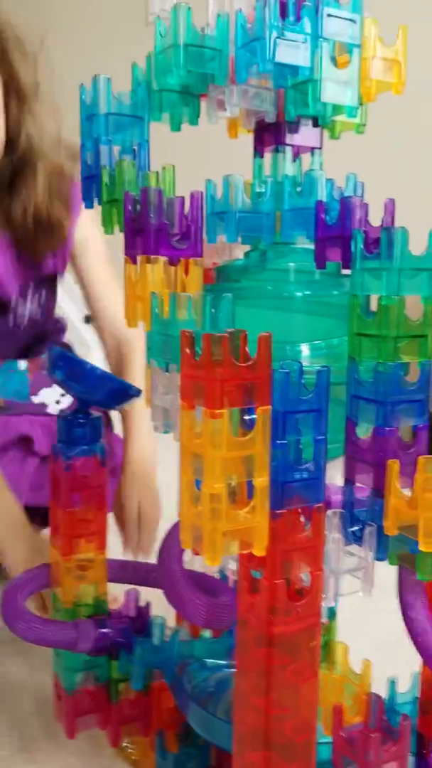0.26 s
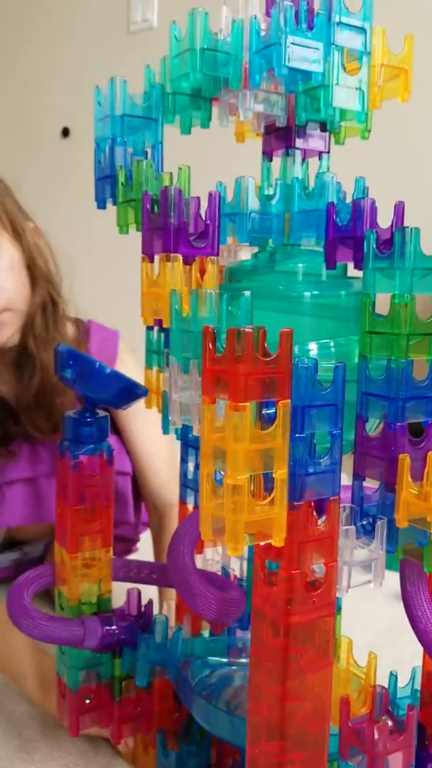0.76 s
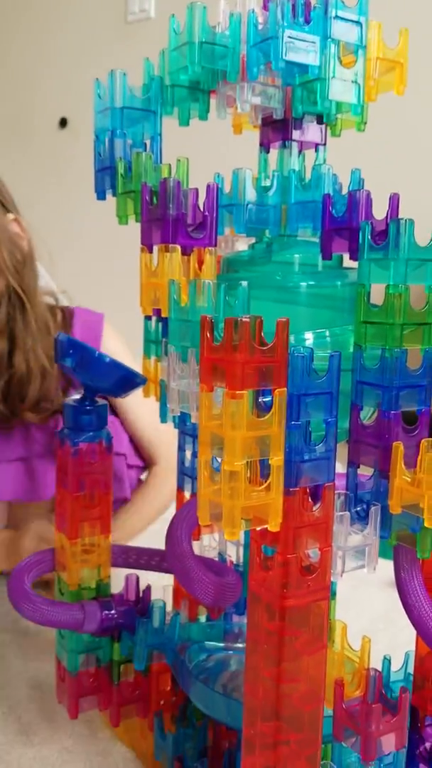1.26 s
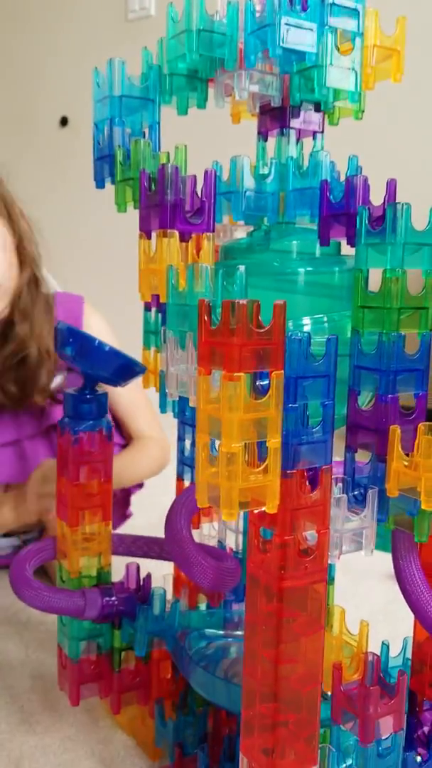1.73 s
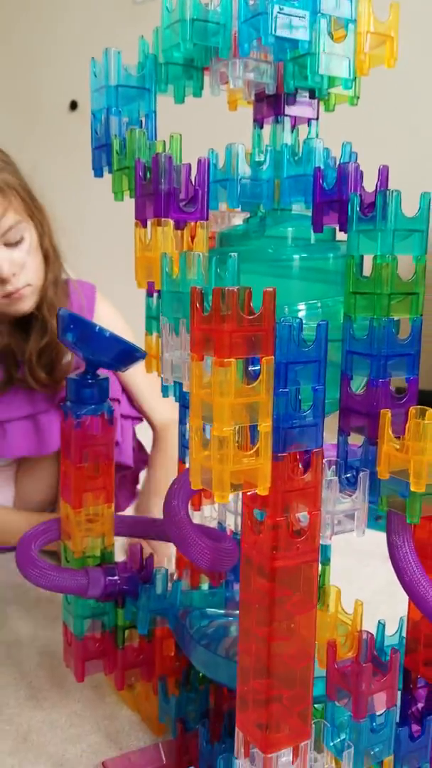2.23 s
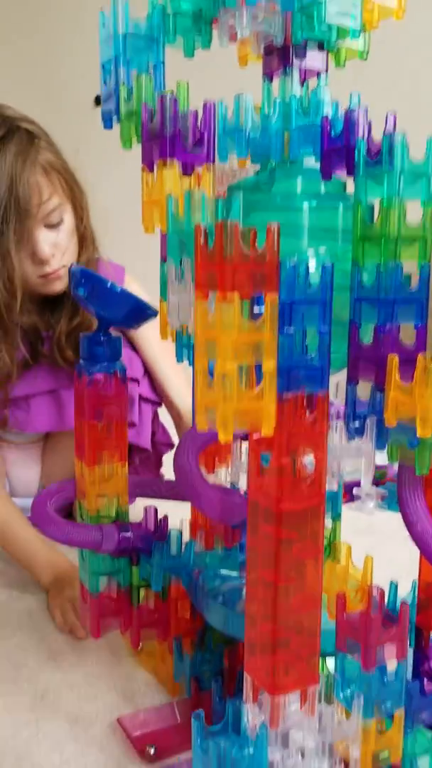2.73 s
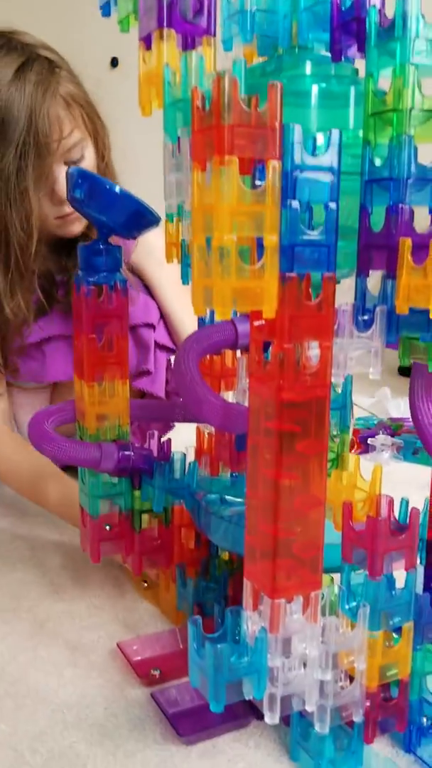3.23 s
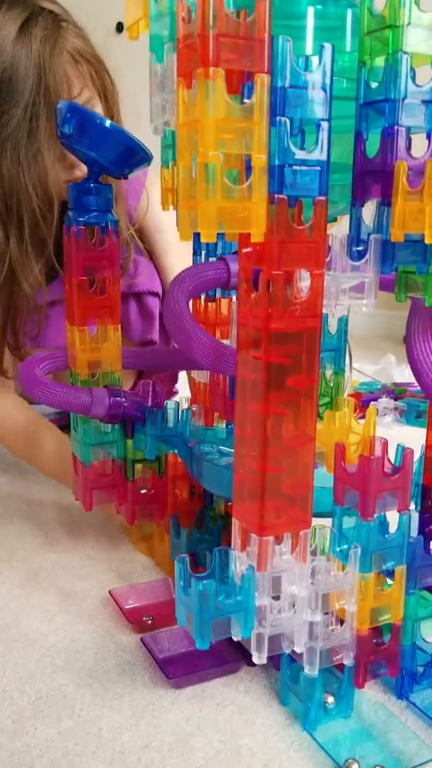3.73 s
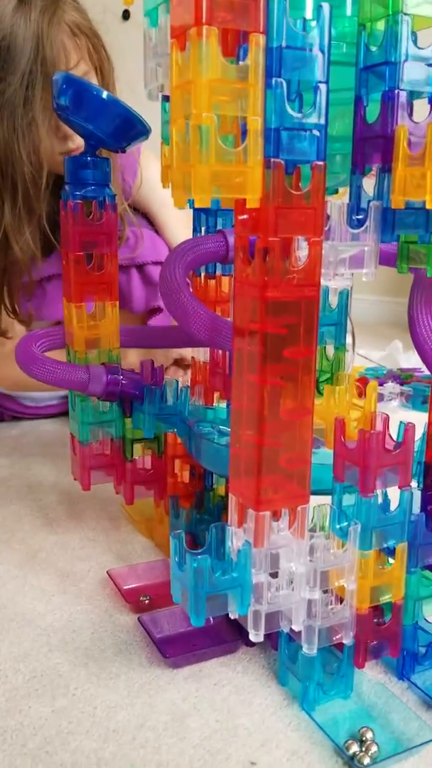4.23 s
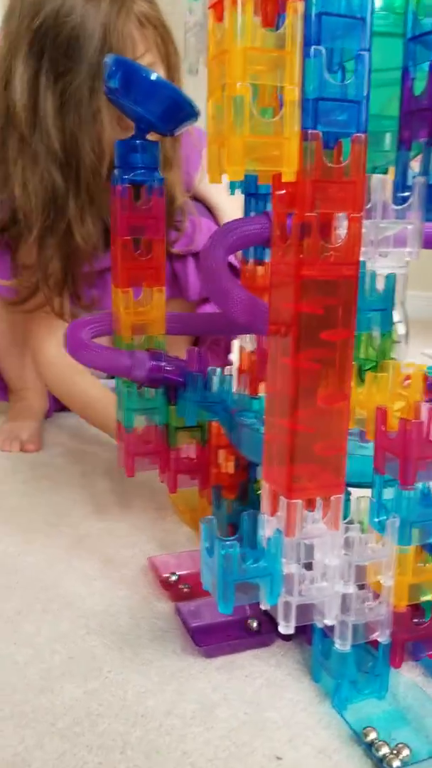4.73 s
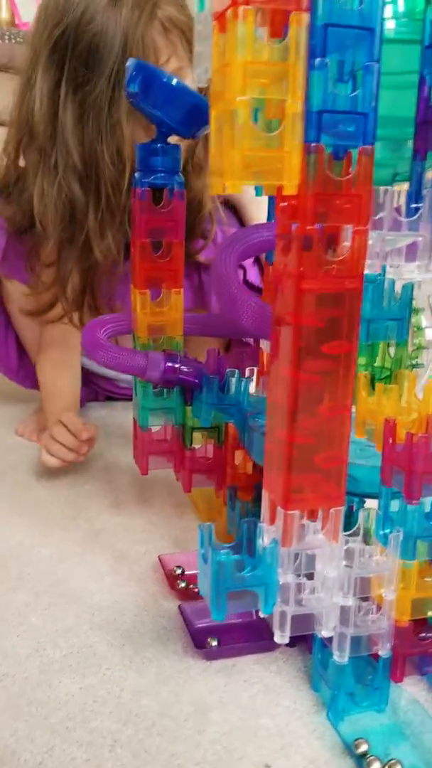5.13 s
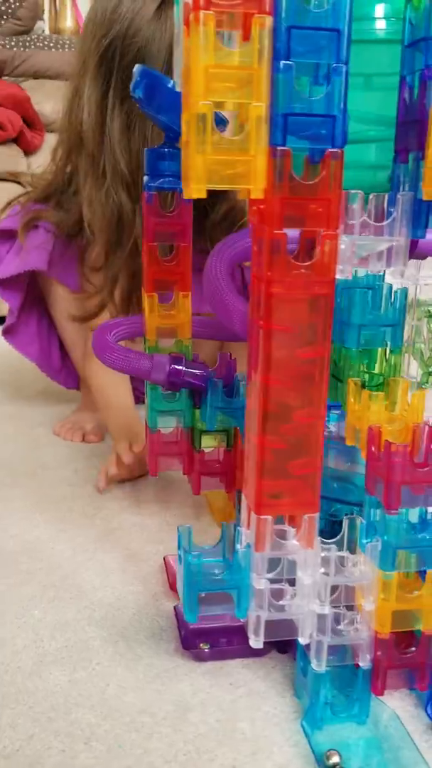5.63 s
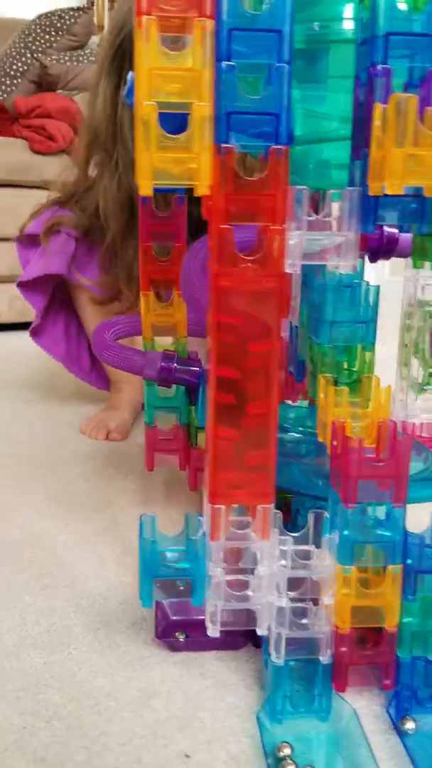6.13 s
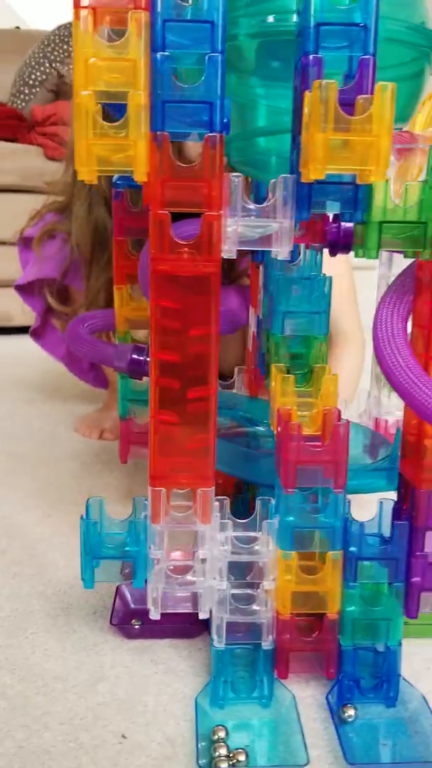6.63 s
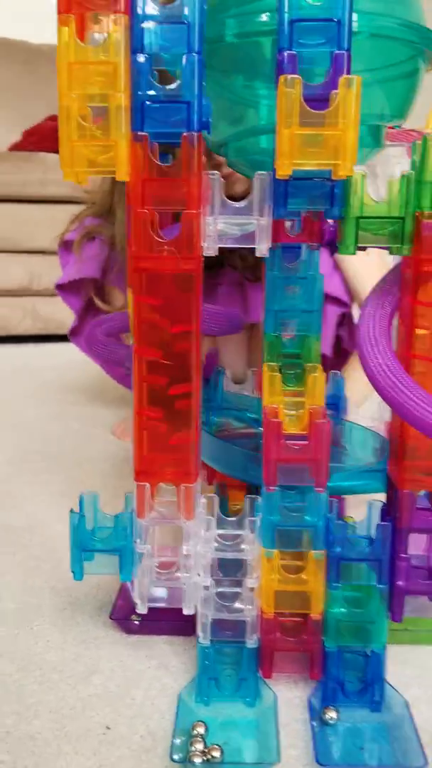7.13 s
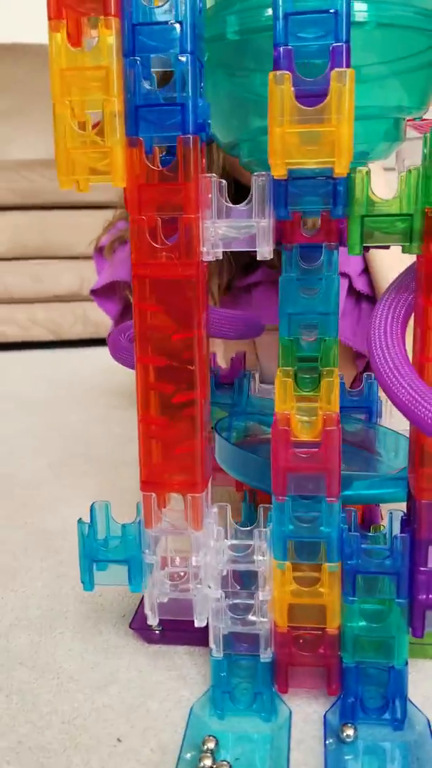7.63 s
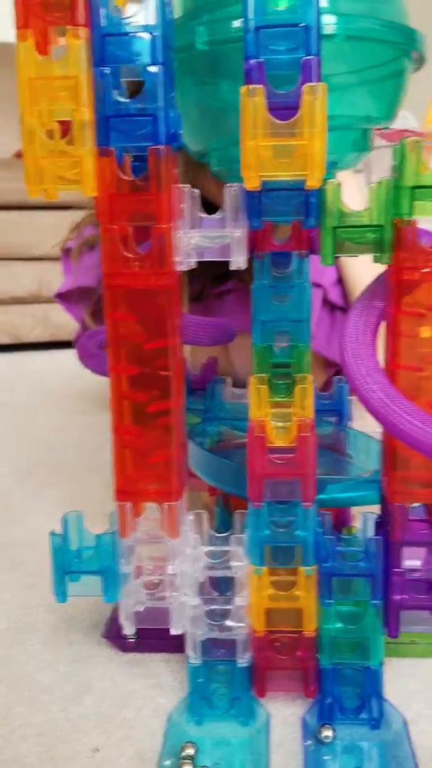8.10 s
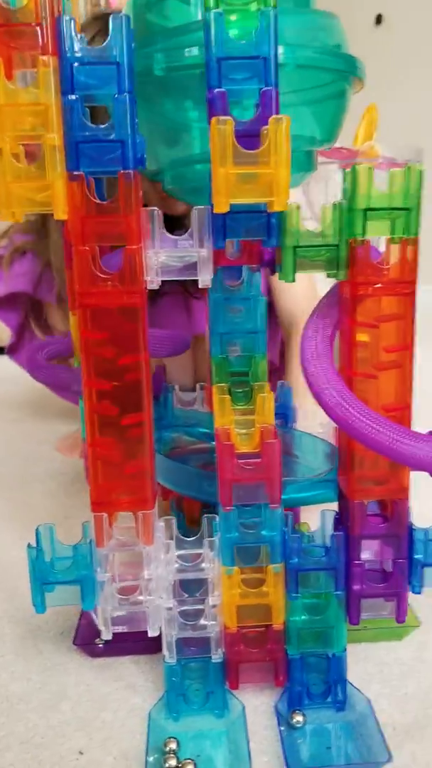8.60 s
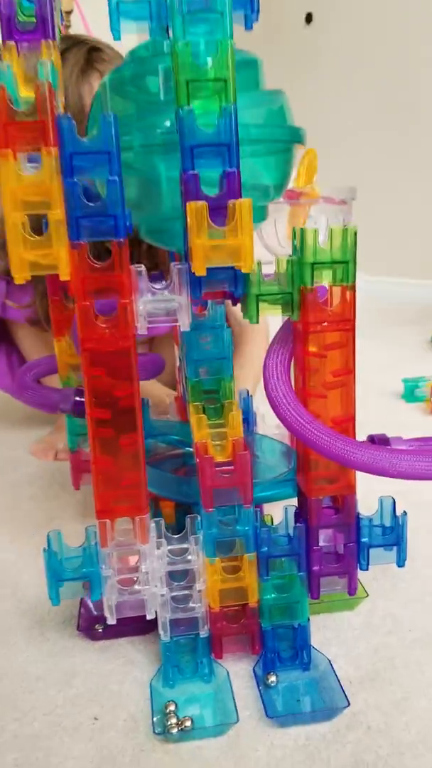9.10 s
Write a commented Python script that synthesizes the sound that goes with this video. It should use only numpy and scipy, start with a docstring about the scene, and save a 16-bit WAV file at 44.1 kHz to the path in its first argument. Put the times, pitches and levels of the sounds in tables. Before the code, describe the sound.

Steel marbles clatter and rattle down through hard hollow plastic cubes and chutes, dense at first, thinning to single knocks and near silence.

```python
"""Marbles in a toy marble run

Steel marbles tumble through hard plastic cubes, close to a phone in a carpeted room with a low hum.
Each drop is a handful of fading sine tones (the cube) plus a short noise burst (the crack).
Weak random bounces and shaped noise (rolling) fill the gaps and thin out as the run empties.
The room answers with fading noise tails; there is an early low push and a last treble rustle."""
import sys
import numpy as np
from scipy import signal
from scipy.fft import rfft, irfft, next_fast_len
from scipy.io import wavfile
from scipy.ndimage import uniform_filter1d, map_coordinates

SR = 44100
rng = np.random.default_rng(int(sys.argv[2]) if len(sys.argv) > 2 else 0)


def master(y):
    """Save y as 16-bit WAV."""
    cut = np.clip(np.atleast_2d(y).T, -1, 1)
    pcm = np.round(cut * 32767)  # scale
    wavfile.write(sys.argv[1], SR, pcm.astype(np.int16))


N = 412772


def amp(db):
    """Turns decibels into a factor."""
    return 10 ** (np.asarray(db) / 20)


def unit(x):
    """Scales a sound to rms 1."""
    return x / np.sqrt(np.mean(x ** 2) + 1e-20)


def along(points, hz):
    """Reads (frequency, value) points between their entries, on a log frequency axis."""
    f, value = np.transpose(points)
    return np.interp(np.log(hz + 1), np.log(f + 1), value)


def curve(rows):
    """Turns (time, value) rows into one value per sample."""
    s, value = np.transpose(rows)
    return np.interp(np.arange(N) / SR, s, value)


def wobble(rate):
    """A smooth random curve with this many random points a second."""
    points = rng.standard_normal(int(N * rate / SR) + 4)
    return map_coordinates(points, [np.arange(N) * rate / SR])


def filtered(x, response):
    """Multiplies the spectrum of a sound by a response of frequency."""
    m = next_fast_len(N + 8192)
    return irfft(rfft(x, m) * response(np.fft.rfftfreq(m, 1 / SR)), m)[..., :N]


def place(s, rows):
    """Adds up short stereo sounds (2, events, samples), each at its own time."""
    at = (np.round(s * SR).astype(int)[:, None] + np.arange(rows.shape[2])).ravel()
    return np.array([np.bincount(at, r.ravel(), N)[:N] for r in rows])


# how alike left and right are: (frequency [Hz], likeness [0 to 1])
LIKENESS = [(300, 0.9), (1000, 0.19), (2000, 0.0061)]


def stereo_noise(spectrum):
    """Noise of rms 1 with a given spectrum; left and right are alike in the bass only."""
    def response(hz):
        turn = np.arccos(np.clip(along(LIKENESS, hz), -1, 1)) / 2
        return amp(along(spectrum, hz)) * [np.cos(turn), np.sin(turn)]

    mid, side = filtered(rng.standard_normal((2, N)), response)
    return unit(np.array([mid + side, mid - side]))


# spectrum of the quiet room: (frequency [Hz], relative level [dB per Hz])
HUM_SPECTRUM = [(20, -26.5), (40, -13), (95, -13.5), (122, -6.5), (150, -17.5), (400, -31), (1000, -36.5),
                (16000, -38.5)]
# level of the hum: low at first, up around 5.5 s, then slowly sinking: (time [s], level [dB])
HUM_LEVEL = [(0, -69.5), (4.8, -73.5), (5.5, -60.5), (9.36, -68.5)]


def hum():
    """The low hum of the quiet room: noise, mostly bass, at a slowly wavering level."""
    return amp(curve(HUM_LEVEL) + 2.0 * wobble(0.72)) * stereo_noise(HUM_SPECTRUM)


def bump():
    """A finger shifts on the phone: one low push, a fading 37 Hz sine from 0.19 s on."""
    t = np.maximum(np.arange(N) / SR - .19, 0)
    return amp(-42.5) * np.sin(2 * np.pi * 37 * t) * amp(-60 * t / 0.45)


# time for the room to fade by 60 dB: (frequency [Hz], time [s])
ROOM_FADE = [(200, 0.72), (1500, 0.22), (1850, 0.66), (2400, .5), (5000, 0.57), (14000, 0.22)]


def room(x):
    """The room's answer: noise tails in which each frequency dies at its own speed."""
    places = 3  # blows land in several places, each with its own tail
    hz, t, z = signal.stft(rng.standard_normal((places, 2, SR * 3 // 4)), SR, nperseg=256)
    alike = along(LIKENESS, hz)[:, None]
    z[:, 1] = alike * z[:, 0] + np.sqrt(np.abs(1 - alike ** 2)) * z[:, 1]
    fade = amp(-60 * t / along(ROOM_FADE, hz)[:, None])
    tails = signal.istft(z * fade, SR, nperseg=256)[1]
    turn = np.arange(N) * 2 * np.pi * 5 / SR  # the sound goes round the places five times a second
    answer = 0
    for k, tail in enumerate(tails):
        share = (1 + np.cos(turn + 2 * np.pi * k / places)) / places
        answer = answer + signal.fftconvolve(x * share, tail / np.linalg.norm(tail[0]), axes=1)[:, :N]
    return answer


RUSTLE_S, RUSTLE_DB, RUSTLE_DB_PER_S = 9.12, -67, 38  # start, level at the start, growth
SCRATCH_T60_S = 0.21  # time for a scratch to fade by 60 dB
# sharper moments of the rustle: (time [s], level [dB])
SCRATCH_TIMES = [(9.293, -55)]


def rustle():
    """A thin, scratchy treble rustle at the end: growing noise with a quick flutter."""
    t = np.arange(N) / SR
    level = (t > RUSTLE_S) * amp(RUSTLE_DB + RUSTLE_DB_PER_S * (t - RUSTLE_S))
    for s, db in SCRATCH_TIMES:
        level = level + (t > s) * amp(db - 60 * np.abs(t - s) / SCRATCH_T60_S)
    noise = stereo_noise([(4500, -22.5), (6500, -7.0), (11000, -1.0), (16000, -8.0)])  # (Hz, dB)
    return level * amp(2.7 * wobble(90)) * noise


ARRIVE_DB_PER_S, RUN_OUT = 1503, 2.11  # rise of a late marble; its fade in dB grows with this power of time
SHARP_DB = -11.5  # crack of the crowd's small bounces
FLIGHT_S, FLIGHT_DB = 0.026, 4.5  # a marble in the air is silent: the rolling thins before a landing
# many marbles under way at once: (time [s], level [dB])
CROWD_LEVEL = [(0, -22.5), (.2, -34), (.55, -36.5), (.75, -27.5), (1.2, -30.5), (1.7, -33.5), (2.7, -28.5),
               (3.1, -31.5), (3.5, -30), (4.17, -36), (4.35, -29.5), (4.62, -41.5), (4.75, -36),
               (5.08, -38), (5.3, -33), (5.7, -38.5), (5.84, -56), (5.9, -90)]
# the last marbles come one by one:
# (start [s], level [dB], time until the roll has lost 30 dB [s], crack of its bounces [dB])
LATE_MARBLES = [(5.862, -34.5, 0.54, -14.5), (6.401, -31.5, 0.64, -13.5), (6.811, -40, 0.76, -15),
                (7.402, -39.5, 0.37, -17.5), (7.736, -27.5, 0.28, -13), (8.32, -37.5, 0.354, -24.5),
                (8.82, -60.5, 0.05, -41)]


def load():
    """Level and crack (dB) of all that rolls: the crowd, then late marbles that run out ever faster."""
    start, db, last, crack_db = np.transpose(LATE_MARBLES)[..., None]
    t = np.arange(N) / SR
    age = t - start
    arrive_db = ARRIVE_DB_PER_S * np.minimum(age, 0)
    run_out_db = 30 * (np.maximum(age, 0) / last) ** RUN_OUT
    crowd = amp(2 * curve(CROWD_LEVEL))  # twice the dB: power
    each = amp(2 * (db + arrive_db - run_out_db))
    power = crowd + each.sum(axis=0)
    landings = np.sort([row[0] for row in DROP_LIST + MORE_KNOCKS] + [np.inf])
    until_landing = landings[np.searchsorted(landings, t)] - t
    in_air = uniform_filter1d(1. * (until_landing < FLIGHT_S), size=100)
    mean_crack_db = (SHARP_DB * crowd + (crack_db * each).sum(axis=0)) / power
    return 10 * np.log10(power) - FLIGHT_DB * in_air, mean_crack_db


# spectrum of rolling: (frequency [Hz], relative level [dB per Hz])
ROLL_SPECTRUM = [(120, -40), (220, -20), (1000, -12), (1230, 6), (1500, -10), (1900, -3), (2600, -13),
                 (6800, -34)]
# loose cubes buzz under the crowd: (frequency [Hz], relative level [dB per Hz])
RATTLE_SPECTRUM = [(1800, -26), (3300, -4.5), (5600, -14), (9000, -31.5)]
SWELL_DB, SWELL_WIDTH_S = 10, .075
# a marble runs down a long hollow chute: (time [s], pitch [Hz])
CHUTE_SWELLS = [(.24, 1240), (1.27, 1250), (2.75, 1270), (5.07, 1040)]


def rolling():
    """Rolling steel makes noise with a hollow peak; each chute shifts the peak to its own pitch."""
    def chute(shift):
        return stereo_noise(np.multiply(ROLL_SPECTRUM, (shift, 1)))

    total = 0
    for shift in (.92, 1.06):
        total = total + chute(shift) * amp(3.5 * wobble(7) + 2.5 * wobble(25))
    peak_hz = max(ROLL_SPECTRUM, key=lambda row: row[1])[0]
    t = np.arange(N) / SR
    for s, hz in CHUTE_SWELLS:
        swell = amp(SWELL_DB) * np.exp(-((t - s) / SWELL_WIDTH_S) ** 2)
        total = total + swell * chute(hz / peak_hz)
    return total


def traffic():
    """Small bounces at random, mostly weak, over the rumble of rolling steel."""
    level_db, crack_db = load()
    luck = rng.random((2200, 4))
    at = (luck[:, 0] * 9 * SR).astype(int)
    burst_db = 2.5 * wobble(16)  # the bounces come in bursts
    db = level_db[at] + 5.5 + burst_db[at] + 4 * luck[:, 1] ** 2
    lower = amp(0.27 * (crack_db[at] - SHARP_DB))  # dull marbles ring the lower modes
    ring_hz = 1000 * 3 ** (luck[:, 2] ** 0.95) * lower
    bounces = knocks(at / SR, db, ring_hz, crack_db[at] + 4 - 22 * luck[:, 3], focus_db=8)
    # steel grazing the walls, less tied to the load
    fizz = amp(0.6 * level_db - 30.0 + 1.2 * wobble(32)) * stereo_noise(CRACK_SPECTRUM)
    rattle = amp(level_db + crack_db - 7.5 + burst_db) * stereo_noise(RATTLE_SPECTRUM)
    return bounces + fizz + rattle + amp(level_db - 10.5) * rolling()


# heavy landings that shake the tower: (time [s], level [dB])
HEAVY_LANDINGS = [(3.211, -23), (4.454, -30), (7.738, -20.5)]


def thuds():
    """A heavy landing sets the tower's low mode going: a short 235 Hz sine."""
    s, db = np.transpose(HEAVY_LANDINGS)
    t = np.arange(SR // 5) / SR
    swing = np.sin(2 * np.pi * 235 * t) * amp(-60 * t / 0.059) * (1 - np.exp(-t / 0.00023))
    return place(s, np.tile(amp(db)[:, None] * swing, (2, 1, 1)))


# modes (natural tones) of a cube: (frequency [Hz], level [dB], time to fade by 60 dB [s])
CUBE_MODES = [(547, -8.5, 0.027), (872, -0.5, 0.013), (1198, -6.5, 0.032), (1424, -1, 0.012),
              (1909, -4.5, 0.038), (2453, -1.5, 0.022), (3045, -1.5, 0.022), (3560, -1, 0.02),
              (5550, -1, 0.016)]


def cube_ring(t, ring_hz, dull_db, focus_db, luck):
    """A struck cube rings in its modes, loudest near the favoured pitch; left and right differ in phase."""
    hz, level, t60 = np.transpose(CUBE_MODES)
    tune = hz * np.exp(0.071 * luck[:, 0])  # each blow finds the modes tuned a little differently
    nearest = np.abs(np.log(tune / ring_hz[:, None])).argmin(axis=1)
    tune[np.arange(len(tune)), nearest] = ring_hz
    near_db = -focus_db * np.minimum(np.abs(np.log2(tune / ring_hz[:, None])), 1.5)
    soft_db = .7 * dull_db * np.maximum(np.log2(tune / 2300), 0)  # a dull blow spares the high modes
    size = amp(level + near_db + soft_db + 1.76 * luck[:, 1])
    size /= np.linalg.norm(size, axis=1, keepdims=True)
    fade = amp(-60 * t / t60[:, None]) * np.cos(np.pi * t / t[-1] / 2)
    swing = np.exp(2j * np.pi * tune[..., None] * t) * fade
    apart = np.minimum(hz / 900, 3) * luck[:, 2]  # the phase gap grows with pitch
    sides = []
    for side in (1, -1):
        port = np.exp(1j * (luck[:, 3] + side * apart / 2)) * amp(side * 1.5 * luck[:, 4])
        sides.append(np.einsum("em,emt->et", size * port, swing).imag)
    onset = (1 - np.exp(-t / (.0002 * amp(-.2 * dull_db)))) ** 2  # a dull blow sets in more gently
    return np.array(sides) * onset


# spectrum of steel on plastic: (frequency [Hz], level [dB])
CRACK_SPECTRUM = [(1500, -17.5), (4000, 4), (6500, 0), (9500, -2.5), (13000, -2.5), (16000, -10)]


def steel_crack(s, t, db, luck):
    """Steel on plastic cracks: a short noise burst, brighter or darker from blow to blow."""
    burst = rng.standard_normal((2, len(s), len(t))) * amp(-60 * t / 0.027)
    burst = burst * (1 - np.exp(-t / 0.00033)) * amp(db)[:, None]
    bright = 1 / (1 + amp(10 * luck[:, 1, :1]))  # share of each crack above its middle pitch

    def high(f):
        return f ** 4 / (f ** 4 + 6500 ** 4)

    crack = filtered(place(s, burst * bright), high)
    crack = crack + filtered(place(s, burst * (1 - bright)), lambda f: 1 - high(f))
    return amp(13.0) * filtered(crack, lambda f: amp(along(CRACK_SPECTRUM, f)))


# low resonance of the whole tower: (centre [Hz], width [Hz], level [dB])
TOWER_MODE = (212.4, 58, 14.75)


def tower_thud(s, db):
    """The whole tower thuds: each blow is a click through one low resonance."""
    clicks = place(s, (amp(db) * [[1], [1]])[..., None])
    c, w, thud_db = TOWER_MODE
    return filtered(clicks, lambda f: amp(thud_db) * 1j * f * w / (c * c - f * f + 1j * f * w))


def knocks(s, db, ring_hz, crack_db, focus_db):
    """Each blow of a marble rings a cube, cracks and makes the tower thud."""
    t = np.arange(600) / SR
    luck = rng.standard_normal((len(s), 5, len(CUBE_MODES)))
    dull_db = np.minimum(crack_db + 14, 0)[:, None]  # below zero for blows with little crack
    ring = cube_ring(t, ring_hz, dull_db, focus_db, luck)
    crack = steel_crack(s, t, db + crack_db, luck)
    uneven_db = 3 * luck[:, 0, 0]
    thud = tower_thud(s, db + uneven_db + 0.027 * dull_db[:, 0])
    return place(s, ring * amp(db - 0.11)[:, None]) + crack + thud


# clear drops: (time [s], level [dB], favoured ring pitch [Hz], crack relative to the ring [dB])
DROP_LIST = [(0.044, -11.5, 1230, -13), (0.331, -7.5, 1836, -17), (0.402, -11.5, 1310, -9),
             (0.44, -12, 3090, -12), (0.525, -13, 1270, -16), (0.606, -12, 805, -11),
             (0.651, -10.5, 1500, -12.5), (0.721, -6, 1470, -11), (0.901, -7, 3330, -11),
             (0.99, -10.5, 1020, -6), (1.021, -10.5, 3700, -11), (1.177, -15.5, 2020, -9),
             (1.327, -12, 1880, -13), (1.425, -7, 4156, -11.5), (1.542, -15.5, 1820, -5.5),
             (1.783, -18.5, 1320, -4.5), (1.82, -16.5, 3160, -6.5), (1.944, -12, 1460, -12),
             (2.07, -10.5, 2970, -17), (2.322, -15.5, 1580, -6), (2.446, -13, 1230, -12.5),
             (2.687, -9.5, 960, -12.5), (2.786, -13, 1270, -10.5), (2.884, -12.5, 3240, -21.5),
             (3.006, -12, 3910, -11), (3.157, -14, 2740, -15.5), (3.215, -11, 1203, -8.5),
             (3.559, -9.5, 1345, -19.5), (3.625, -10, 3530, -14), (3.82, -13, 1370, -8),
             (3.919, -10.5, 3300, -12.5), (4.148, -13, 1360, -23), (4.197, -8.5, 1440, -40.5),
             (4.213, -7.5, 5100, -6.5), (4.276, -10.5, 3180, -12.5), (4.363, -17, 5140, -4.5),
             (4.398, -11.5, 1280, -11.5), (4.805, -18.5, 2250, -12.5), (5.168, -8, 2230, -17.5),
             (5.345, -14, 1260, -15.5), (5.415, -15, 1910, -13), (5.512, -16.5, 2600, -33),
             (5.552, -15, 2970, -17), (5.846, -10.5, 1340, -20), (5.879, -14.5, 2035, -14),
             (6.303, -29.5, 1474, -47.5), (6.406, -13, 2750, -34.5), (6.508, -12.5, 1500, -42),
             (6.584, -8, 1800, -23), (7.005, -16, 1250, -29), (7.494, -25.5, 2250, -15),
             (7.534, -16.5, 1805, -24), (7.709, -14, 1520, -20), (7.737, -12, 1220, -12.5),
             (7.864, -21, 1880, -14), (8.055, -30.5, 1340, -28.5), (8.825, -45, 701, -57)]
# more clear knocks, with the ring pitch and crack of the drop listed before: (time [s], level [dB])
MORE_KNOCKS = [(.07, -11.5), (0.199, -11.5), (.418, -12), (0.57, -8), (0.676, -16.5), (.945, -7.5),
               (0.999, -18), (1.087, -8), (1.392, -13), (1.481, -14), (2.355, -17.5), (2.394, -18),
               (2.463, -18), (2.637, -11.5), (2.811, -11.5), (3.317, -14), (3.351, -14.5), (3.398, -15),
               (3.591, -9.5), (3.751, -7), (3.889, -12), (3.986, -14), (4.024, -9), (4.287, -11.5),
               (4.682, -19), (5.101, -32), (5.156, -26), (5.179, -15), (5.219, -12), (5.623, -16.5),
               (5.902, -17), (5.95, -10.5), (5.996, -13), (6.115, -16.5), (6.339, -21), (6.355, -25),
               (6.386, -19.5), (6.414, -16), (6.539, -12.5), (6.614, -13), (6.716, -22), (6.814, -13),
               (6.852, -16.5), (7.169, -18), (7.33, -32), (7.393, -20.5), (7.413, -31), (7.556, -16.5),
               (7.793, -16), (8.329, -19.5), (8.336, -28), (8.351, -11.5), (8.371, -14.5), (8.382, -16.5),
               (8.406, -19), (8.499, -21.5), (8.885, -41.5), (8.917, -43)]


def drops():
    """Marbles fall from ledge to ledge; each blow chatters twice more within 28 ms, weaker."""
    drop_s, drop_db, ring_hz, crack_db = np.transpose(DROP_LIST)
    more_s, more_db = np.transpose(MORE_KNOCKS)
    listed = np.append(np.arange(len(DROP_LIST)), np.searchsorted(drop_s, more_s) - 1)
    s, db = np.append(drop_s, more_s), np.append(drop_db, more_db)
    luck = rng.random((len(s), 2, 2))
    late = np.cumsum(.003 + .011 * luck[:, 0], axis=1)  # seconds after the blow
    again_db = db[:, None] - 3.0 - 250 * np.abs(late) - 10 * luck[:, 1]
    all_s = np.column_stack([s, s[:, None] + late]).ravel()
    all_db = np.column_stack([db, again_db]).ravel()
    return knocks(all_s, all_db, np.repeat(ring_hz[listed], 3), np.repeat(crack_db[listed], 3), focus_db=10)


# the phone turns: (time [s], left over right [dB])
LEFT_LEAN = [(2.5, 0), (6.3, 2.9), (7.5, 1.7), (9.3, 4)]


def scene():
    """The marble run and the rustle up close, with the room's answer, the hum and the bump."""
    run = drops() + thuds() + traffic()
    run = filtered(run, lambda hz: hz ** 4 / (hz ** 4 + 150 ** 4))  # the run is heard with little below 150 Hz
    lean = curve(LEFT_LEAN) / 2
    near = (run + rustle()) * amp([lean, -lean])
    return near + amp(-10.0) * room(run) + hum() + bump()


def record(dry):
    """The phone's band limit: the treble fades from 15.7 kHz and is gone at 16.9 kHz."""
    return filtered(dry, lambda hz: np.clip((16900 - hz) / 1200, 0, 1) ** 4)


dry = scene()
out = record(dry)
master(out)
```